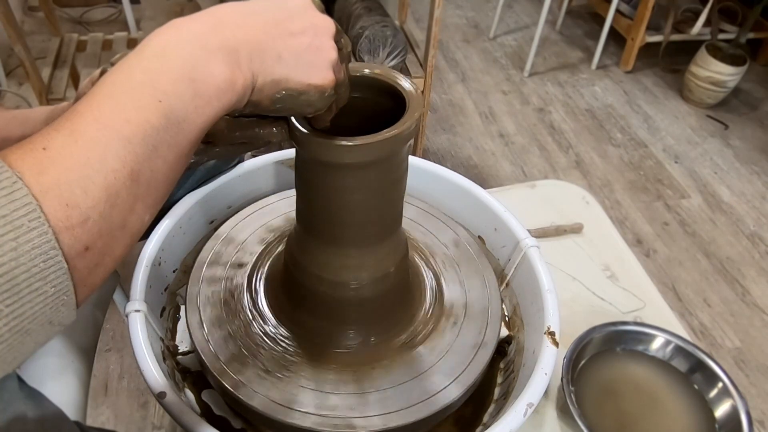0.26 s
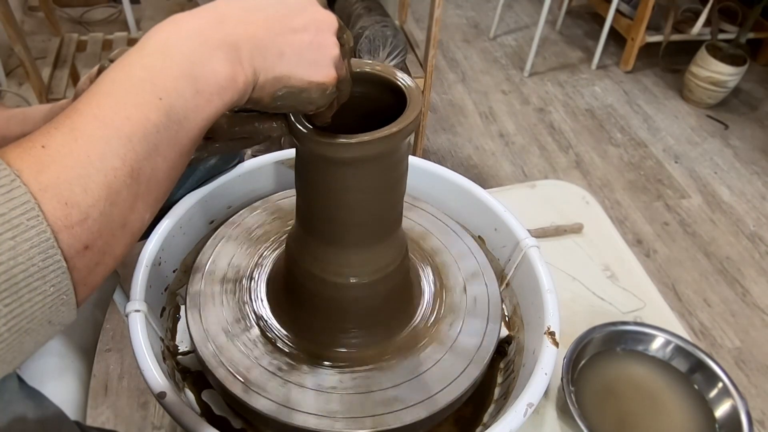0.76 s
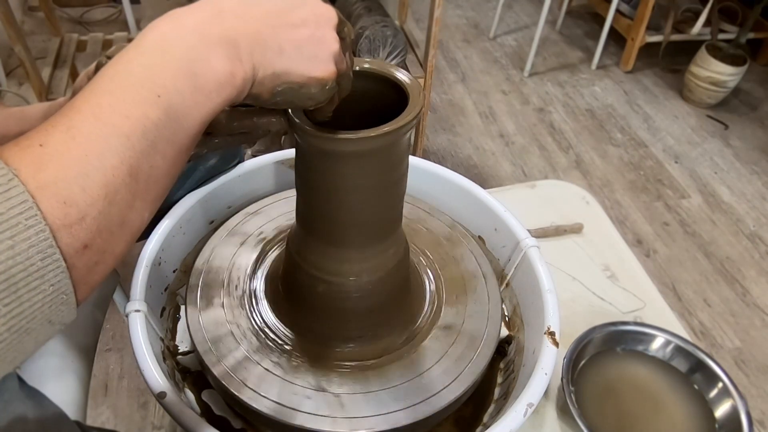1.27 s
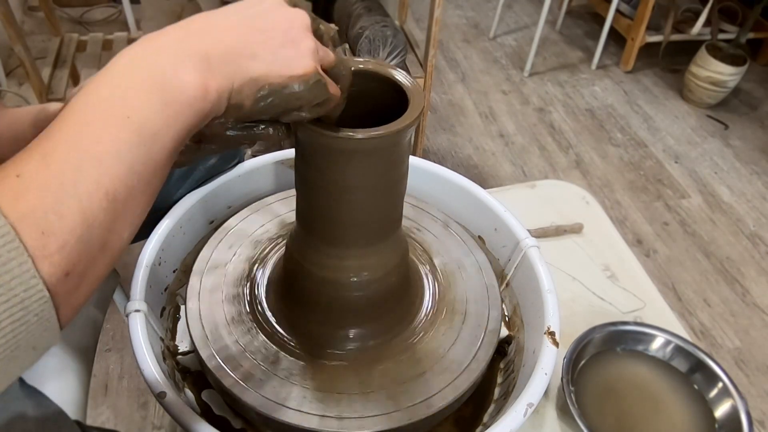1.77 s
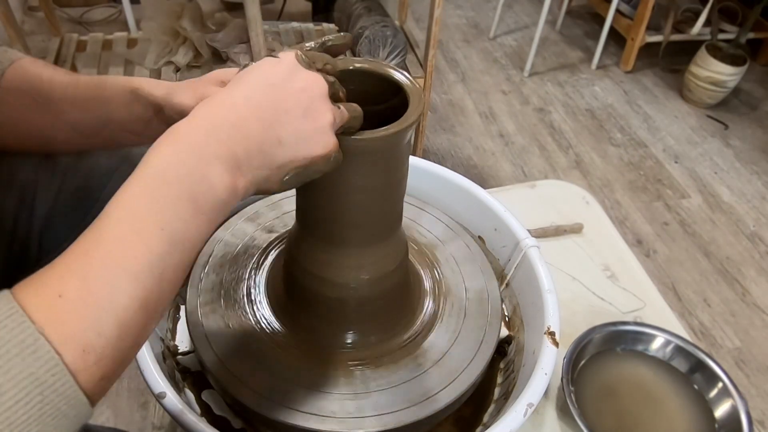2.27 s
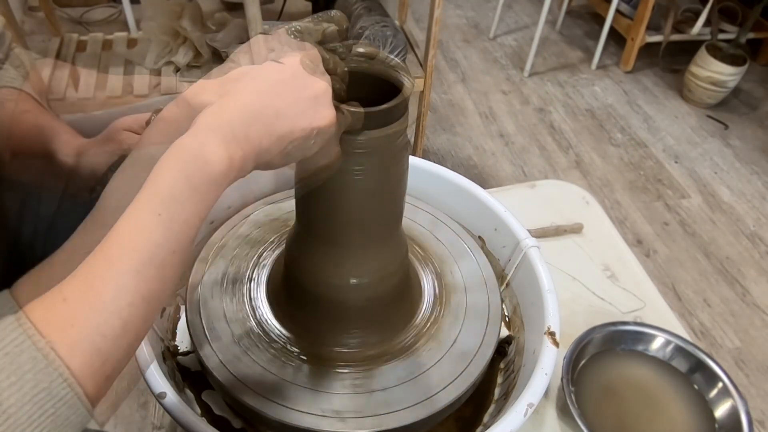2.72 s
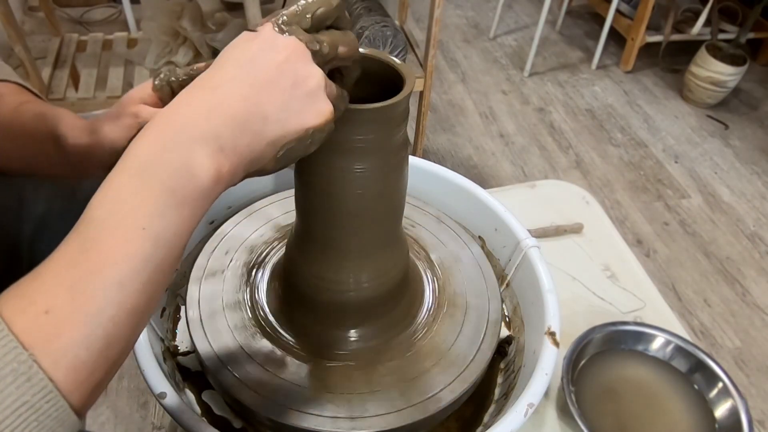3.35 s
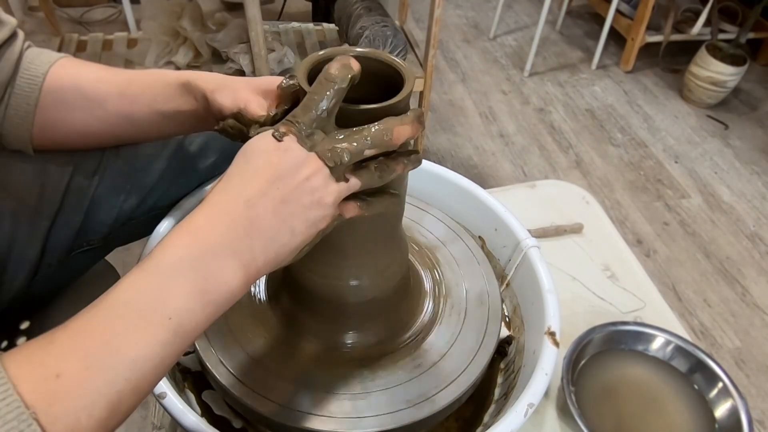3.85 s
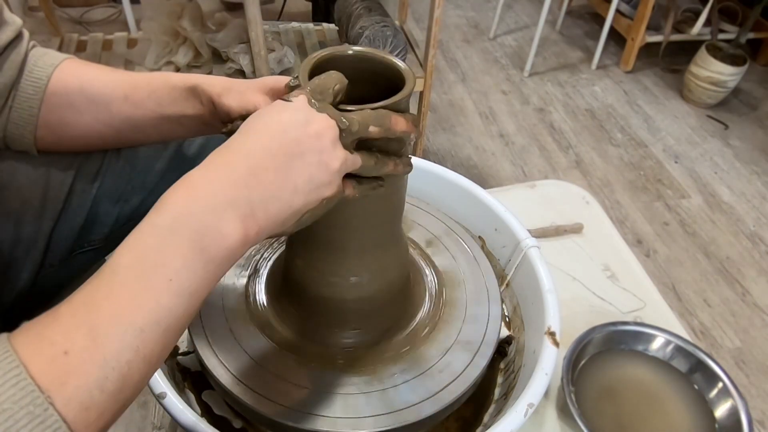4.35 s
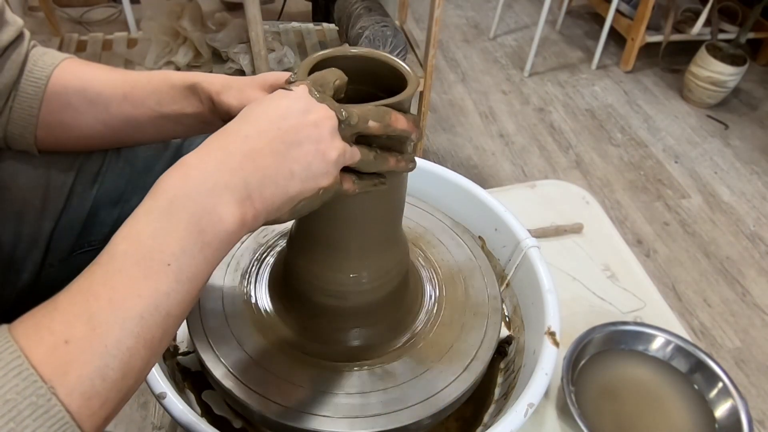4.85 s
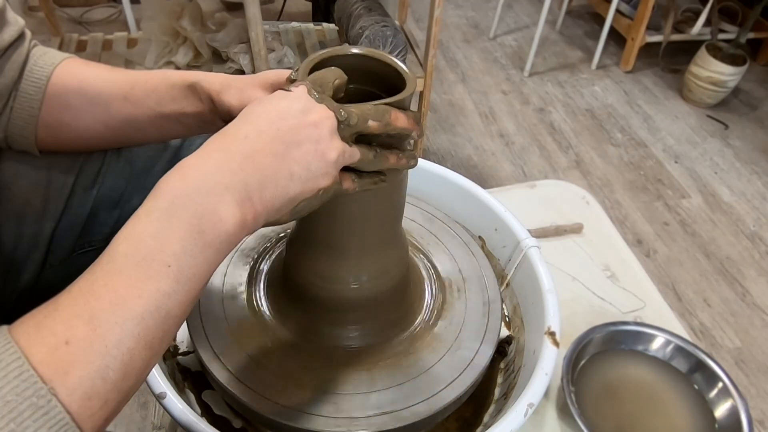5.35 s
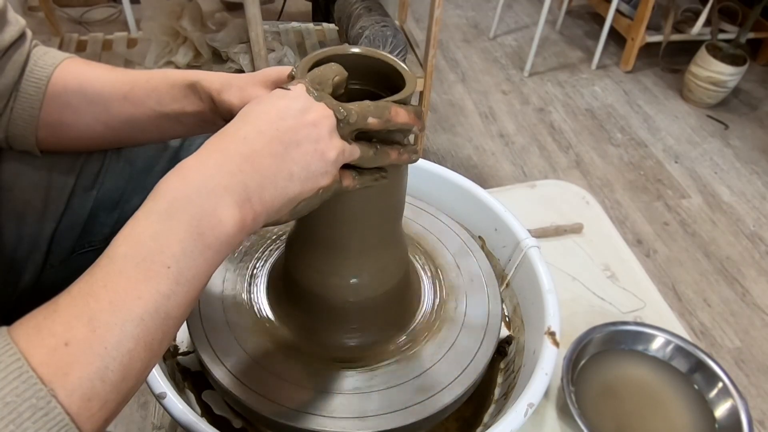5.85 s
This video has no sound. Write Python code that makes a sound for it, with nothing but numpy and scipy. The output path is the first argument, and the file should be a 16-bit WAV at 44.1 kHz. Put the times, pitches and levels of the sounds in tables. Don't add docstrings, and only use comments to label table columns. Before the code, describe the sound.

An electric pottery wheel drones with a deep, rumbling motor hum while wet clay softly hisses under fingers and tools tick faintly far off.

```python
import sys
import numpy as np
from scipy import signal
from scipy.io import wavfile

SR = 44100
rng = np.random.default_rng(int(sys.argv[2]) if len(sys.argv) > 2 else 0)


def natural_amplitude(level_db):
    exponent = np.asarray(level_db, float) / 20
    return 10 ** exponent


def master(y):
    cut = np.clip(np.atleast_2d(y).T, -1, 1)
    pcm = np.round(cut * 32767)
    wavfile.write(sys.argv[1], SR, pcm.astype(np.int16))


N = 268569
LEFT_RIGHT = np.array([[1], [-1]])


def rms_one(x):
    return x / np.sqrt(np.mean(x ** 2) + 1e-20)


def at_hz(points, hz):
    table_hz, value = np.transpose(points)
    return np.interp(np.log(hz), np.log(table_hz), value)


CHANGE_S = 2.678


def by_load(loaded, eased):
    return np.interp(np.arange(N) / SR, [CHANGE_S - 0.004, CHANGE_S + 0.004], [loaded, eased])


def drift(rate_hz):
    r = np.exp(-80 * np.pi * rate_hz / SR)
    noise = rng.standard_normal(N // 40 + 4002)
    slow = signal.lfilter([1], [1, -2 * r, r * r], noise)[4000:]
    return np.interp(np.arange(N) / 40, np.arange(len(slow)), rms_one(slow - slow.mean()))


# frequency in Hz, correlation.
ROOM_LIKENESS = [(30, 0.99), (200, 0.96), (350, 0.99), (600, 0.75), (1100, 0.29), (2500, 0.59),
                 (5000, 0.15), (10000, 0.033)]
# frequency in Hz, left minus right in dB.
ROOM_LEAN = [(30, -1.5), (100, -1.6), (300, -0.7), (700, -3.5), (1400, -1.5), (2800, -1.3), (5500, 2.5),
             (10000, -7.5), (14000, -1)]


def lean_gain(hz):
    return natural_amplitude(at_hz(ROOM_LEAN, hz) / 2 * LEFT_RIGHT)


def placed(mid, side, hz):
    alike = np.clip(at_hz(ROOM_LIKENESS, hz), -1, 1)
    pair = np.sqrt(1 + alike) * mid + np.sqrt(1 - alike) * side * LEFT_RIGHT
    return pair * lean_gain(hz) / np.sqrt(1 + alike)


def tone(hz, wobble_hz, wobble_db, lag_rad):
    phase = 2 * np.pi * (np.cumsum(hz + wobble_hz * drift(4.1)) / SR + rng.random())
    level = np.sqrt(2) * natural_amplitude(wobble_db * drift(3.47)) * lean_gain(np.mean(hz))
    return level * np.sin(phase + lag_rad / 2 * LEFT_RIGHT)


def banded_noise(level_db, low_hz, count, patchy_db):
    out = 0
    edges_hz = low_hz * 2 ** (np.arange(count + 1) / 3)
    white = rng.standard_normal((2, 2, N + SR // 2))
    for k, (low, high) in enumerate(zip(edges_hz, edges_hz[1:])):
        band = signal.butter(2, [low, high], "band", fs=SR, output="sos")
        mid, side = signal.sosfilt(band, white[k % 2])[:, -N:]
        hz = np.sqrt(low * high)
        out = out + natural_amplitude(level_db(hz) + patchy_db * drift(15)) * placed(mid, side, hz)
    return out


def narrow(hz, width_hz):
    r = np.exp(-np.pi * max(width_hz, 1) / SR)
    section = [1, 0, -1, 1, -2 * r * np.cos(2 * np.pi * hz / SR), r * r]
    noise = rng.standard_normal((2, N + SR // 2))
    mid, side = rms_one(signal.sosfilt([section, section], noise)[:, -N:])
    return placed(mid, side, hz)


# start in seconds, centre in Hz, width in Hz, level in dB rms, t60 in seconds.
TOOL_TICKS = [(0.639, 2580, 2580, -59, 0.55), (0.639, 5200, 3200, -64, 0.49),
              (0.645, 10060, 7000, -81, 0.082), (2.722, 9000, 1790, -83, 0.17),
              (2.771, 5600, 300, -75, 0.13), (2.886, 2650, 500, -67, 0.3), (2.899, 2500, 300, -71, 0.69),
              (3.183, 5350, 500, -76.5, 0.32), (4.612, 3060, 400, -61.5, 0.38),
              (2.989, 1740, 120, -65, 0.5), (3.809, 1970, 1200, -71, 0.2), (4.605, 3100, 1600, -66.5, 0.56),
              (4.65, 5480, 800, -73.5, 0.31), (2.576, 4900, 400, -80, 0.11)]
# centre Hz, width Hz, level dB rms, t60 s.
CRACK, CRACK_PAN_DB = (5800, 5004, -56.5, 0.03), -12
CRACK_S = 0.6385
TAIL_PAN_DB_PER_OCTAVE, TAIL_CENTRE_HZ = -2.5, 4200


def ticks():
    out = np.zeros((2, N + SR))
    t = np.arange(SR // 2) / SR
    pans = [TAIL_PAN_DB_PER_OCTAVE * np.log2(row[1] / TAIL_CENTRE_HZ) for row in TOOL_TICKS]
    events = [(CRACK_S, *CRACK)] + list(TOOL_TICKS)
    for (start_s, hz, width_hz, level_db, t60_s), pan_db in zip(events, [CRACK_PAN_DB] + pans):
        at = round(start_s * SR)
        band = signal.butter(2, [hz - width_hz / 2, hz + width_hz / 2], "band", fs=SR, output="sos")
        mid, side = rms_one(signal.sosfilt(band, rng.standard_normal((2, len(t)))))
        tail = natural_amplitude(level_db - 60 * t / t60_s) * np.minimum(t / 0.0017, 1)
        out[:, at:at + len(t)] += tail * placed(mid, side, hz) * natural_amplitude(pan_db / 2 * LEFT_RIGHT)
    return out[:, :N]


SWITCHING_HZ = [6923.5, 6959.3, 6995.6, 7031.3, 7067, 13722, 13901, 13936.7, 14008.7, 14044.6, 14080.5,
                14116, 14152]
# level loaded in dB, level eased in dB.
SWITCHING_DB = [(-104, -102), (-102, -100), (-89, -89.5), (-82.5, -82.5), (-105, -110), (-112, -114),
                (-113, -112), (-102.5, -100), (-110, -110), (-105, -108), (-115, -114), (-107, -110),
                (-106, -110)]


def drive_whine():
    out = 0
    for hz, (loaded_db, eased_db) in zip(SWITCHING_HZ, SWITCHING_DB):
        out = out + natural_amplitude(by_load(loaded_db, eased_db)) * tone(np.full(N, hz), 0.05, 0.78, lag_rad=0.9)
    return out


HOUSING_HZ = [68, 99.5, 107.5, 204, 226, 296, 323, 368, 430.7, 755, 790, 1038, 1668, 2116, 2583, 7100,
              14030]
# level loaded in dB, level eased in dB, width in Hz.
HOUSING_DB = [(-50.5, -51, 16), (-48.5, -53, 3.6), (-58.5, -54, 3.1), (-57.5, -56.5, 11), (-71, -64, 10),
              (-67.5, -61.5, 6.5), (-59.5, -61, 14.3), (-63.5, -66, 12), (-64, -66, 13), (-66.5, -62, 33),
              (-75, -73, 16), (-63.5, -78, 80), (-71, -73, 72), (-77, -96, 93), (-84, -91.5, 67),
              (-91.5, -91.5, 980), (-101, -101, 520)]
# Hz, level loaded in dB, level eased in dB, width in Hz.
FLOOR_BOOMS = [(36.36, -51.5, -45, 5.), (61, -48.5, -48, 9.2), (88, -51, -49.5, 17), (637.7, -71, -67, 18)]


def housing():
    rows = [(hz, *row) for hz, row in zip(HOUSING_HZ, HOUSING_DB)] + list(FLOOR_BOOMS)
    out = 0
    for hz, loaded_db, eased_db, width_hz in rows:
        out = out + natural_amplitude(by_load(loaded_db, eased_db)) * narrow(hz, width_hz)
    return out


# frequency in Hz, level in dB per Hz.
ROAR_LOADED = [(30, -6), (50, -1), (75, -6), (120, -4.5), (230, -14.5), (400, -17), (600, -23.5),
               (900, -29), (1600, -31), (3000, -42.5), (5000, -54), (7500, -59), (10000, -81), (13500, -84)]
# frequency in Hz, level in dB per Hz.
ROAR_EASED = [(30, -6.5), (50, -7), (75, -2), (120, -4.5), (230, -17.5), (400, -21.5), (600, -27.5),
              (900, -36), (1600, -34.5), (2600, -50.5), (5000, -56.5), (7500, -61), (10000, -79),
              (13500, -86)]
ROAR_DB = -43.5


def roar():
    def level_db(hz):
        return by_load(at_hz(ROAR_LOADED, hz), at_hz(ROAR_EASED, hz))
    return natural_amplitude(ROAR_DB) * rms_one(banded_noise(level_db, 17.35, count=29, patchy_db=1.0))


# middle in seconds, pitch in Hz, peak in dB rms, half length in seconds.
LOW_SWELLS = [(.2, 35, -42, 0.17), (0.365, 68, -37.5, 0.086), (0.677, 87, -44.5, 0.11),
              (1.52, 64, -43.5, .09), (2.316, 62, -37, 0.093), (2.76, 66, -35.5, 0.11),
              (2.8, 88, -43, .08), (3.378, 70, -41, .09), (3.633, 35, -38, 0.12), (3.82, 35.5, -38, .1),
              (3.902, 89, -41.5, 0.12), (4.4, 66, -42.5, 0.16), (4.586, 90, -37.5, 0.07),
              (4.764, 89, -40, 0.073), (5.022, 35.5, -41, 0.16), (5.38, 35, -41, 0.11)]


def low_swells():
    t = np.arange(N) / SR
    out = 0
    for middle_s, hz, peak_db, half_s in LOW_SWELLS:
        swell = np.cos(np.pi / 2 * np.clip((t - middle_s) / half_s, -1, 1)) ** 2
        out = out + natural_amplitude(peak_db) * swell * tone(np.full(N, hz), 0.3, 0.3, lag_rad=0.22)
    return out


# pitch loaded in Hz, pitch eased in Hz.
SHAFT_HZ = [(31.9, 32.3), (85.6, 87), (147.6, 150.1)]
# level loaded in dB, level eased in dB, waver in dB, right-ear lag in radians.
SHAFT_DB = [(-42, -41.5, 1.5, 0.12), (-55.5, -44.5, 2, 0.17), (-42.5, -48.5, 0.53, 0.13)]
GEAR_HZ = (736.6, 744.9, 753.7, 763, 772)
# level loaded in dB, level eased in dB, waver in Hz, waver in dB.
GEAR_DB = [(-69, -77, 0.54, 1), (-56.5, -65, 0.32, 1), (-64, -62.5, 0.46, 2.6), (-84, -69, 0.65, 2.5),
           (-71.5, -78, 0.58, 1)]
# time in seconds, level over the mean in dB.
TOOTH_PRESS = [(0, 3.5), (.2, 0.5), (.4, -4.5), (.75, -2.5), (1.2, 2.5), (1.6, -4.5), (1.999, 4),
               (2.3, -1.5), (2.6, 1.5), (3.0, -0.5), (3.5, -1.5), (4.1, 3), (4.6, 2), (5.2, -2.5), (5.6, 0),
               (6.09, -3.8)]


def motor_hum():
    hums = gear = 0
    for hz, (loaded_db, eased_db, waver_db, lag_rad) in zip(SHAFT_HZ, SHAFT_DB):
        hums = hums + natural_amplitude(by_load(loaded_db, eased_db)) * tone(by_load(*hz), 0.2, waver_db, lag_rad)
    for hz, (loaded_db, eased_db, waver_hz, waver_db) in zip(GEAR_HZ, GEAR_DB):
        line = tone(np.full(N, hz), waver_hz, waver_db, lag_rad=0.82)
        gear = gear + natural_amplitude(by_load(loaded_db, eased_db)) * line
    press_db = np.interp(np.arange(N) / SR, *np.transpose(TOOTH_PRESS))
    return hums + natural_amplitude(press_db) * gear


# frequency in Hz, level in dB per Hz.
RUB_SPECTRUM = [(1500, -14), (2200, 0.5), (3000, 4), (4200, -1.5), (6000, -13.5), (8000, -21.5)]
# frequency in Hz, level in dB per Hz.
HISS_SPECTRUM = [(3000, -27), (4500, 1.5), (6500, 4.5), (8000, -0.5), (10000, -18), (13000, -19)]
# start in seconds, length in seconds, rise in seconds, rub in dB, hiss in dB.
FINGER_STROKES = [
    (0.198, 2, 0.62, -80.5, -92.5),
    (1.794, .9, .1, -70, -88.5),
    (2.048, 0.57, .31, -77, -65.5),
    (2.9, 0.26, .12, -89, -94),
    (3.2, 1.12, 0.49, -81.5, -78.5),
    (4.34, 0.17, 0.1, -77, -88),
    (5.295, .21, .06, -76.5, -88.5),
    (5.5, 0.22, 0.14, -78, -89),
]
REST_RUB_DB, REST_HISS_DB = -87.5, -95
FALL_PER_RISE, SWELL_POWER = 0.96, 3.5


def wet_clay():
    t = np.arange(N) / SR
    rub_gain, hiss_gain = natural_amplitude(REST_RUB_DB), natural_amplitude(REST_HISS_DB)
    for start_s, length_s, rise_s, rub_db, hiss_db in FINGER_STROKES:
        rise = (t - start_s) / rise_s
        fall = (start_s + length_s - t) / (FALL_PER_RISE * rise_s)
        press = np.sin(np.pi / 2 * np.clip(np.minimum(rise, fall), 0, 1)) ** SWELL_POWER
        rub_gain = rub_gain + natural_amplitude(rub_db) * press
        hiss_gain = hiss_gain + natural_amplitude(hiss_db) * press
    rub = rms_one(banded_noise(lambda hz: at_hz(RUB_SPECTRUM, hz), 1750.0, count=6, patchy_db=0.7))
    hiss = rms_one(banded_noise(lambda hz: at_hz(HISS_SPECTRUM, hz), 3400.0, count=6, patchy_db=0.7))
    return rub_gain * rub + hiss_gain * hiss


def scene():
    return ticks() + drive_whine() + housing() + roar() + low_swells() + motor_hum() + wet_clay()


def top_cut(x):
    return signal.sosfilt(signal.butter(12, 14360, fs=SR, output="sos"), x)


def record(dry):
    fade_in = np.minimum(np.arange(N) / SR / 0.0033, 1)
    rumble_cut = signal.butter(2, 26.0, "high", fs=SR, output="sos")
    mix = signal.sosfilt(rumble_cut, dry * fade_in)
    return top_cut(mix)


dry = scene()
out = record(dry)
master(out)
```